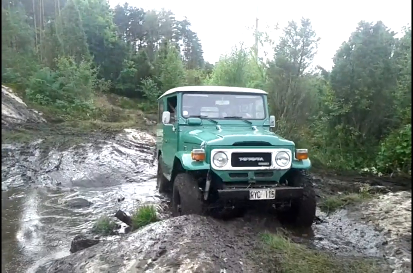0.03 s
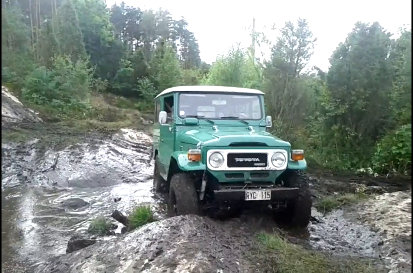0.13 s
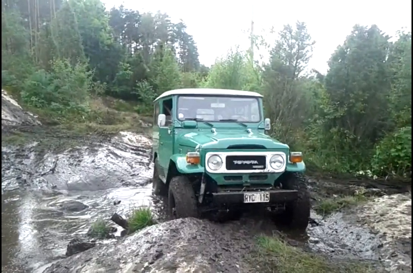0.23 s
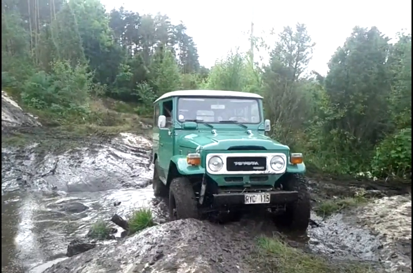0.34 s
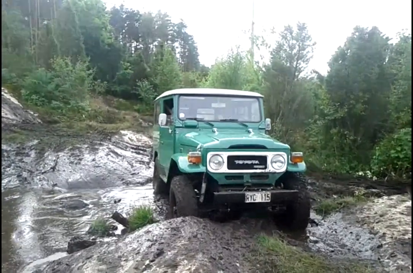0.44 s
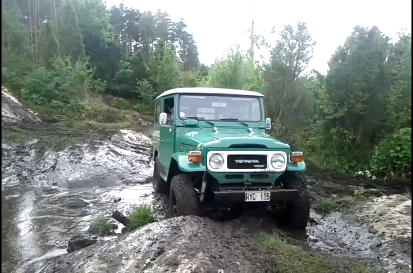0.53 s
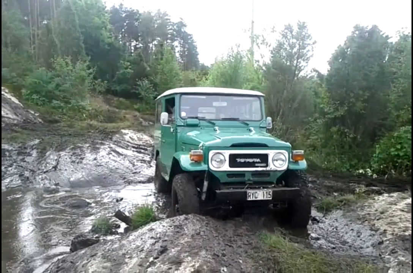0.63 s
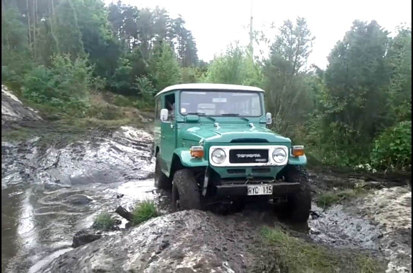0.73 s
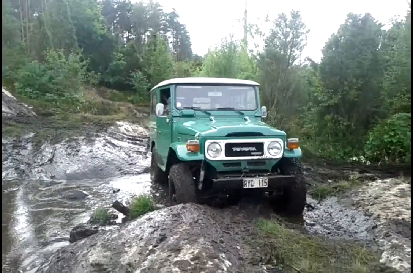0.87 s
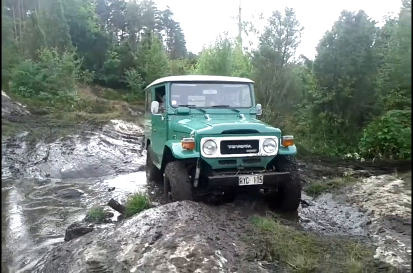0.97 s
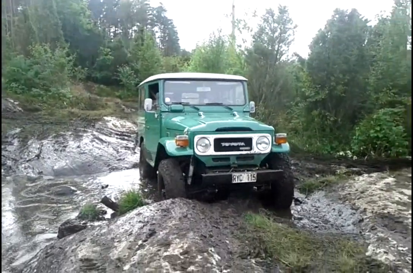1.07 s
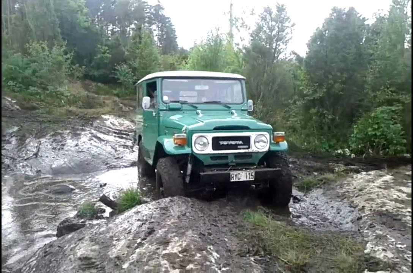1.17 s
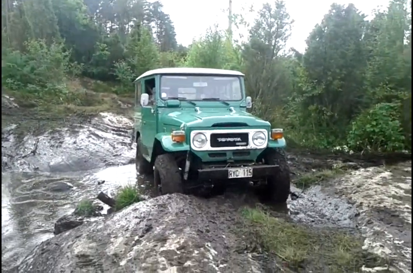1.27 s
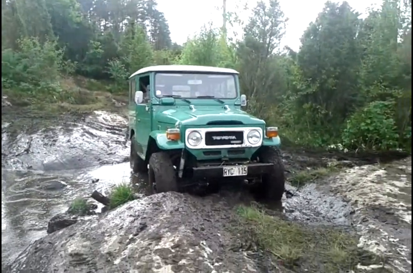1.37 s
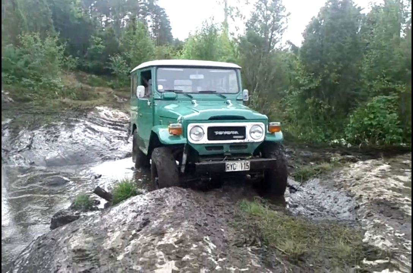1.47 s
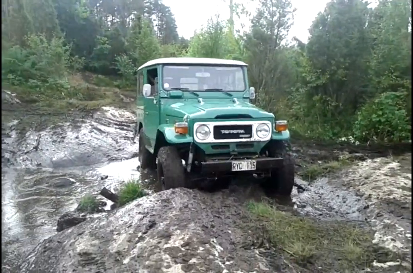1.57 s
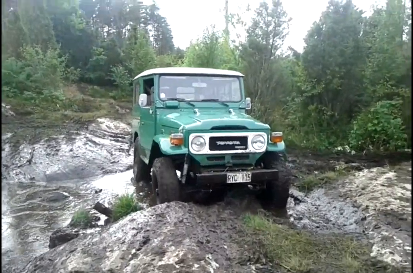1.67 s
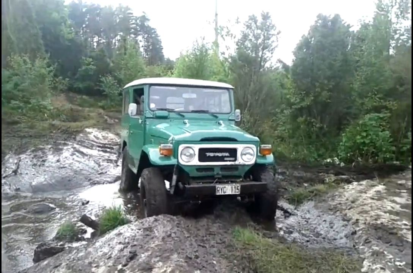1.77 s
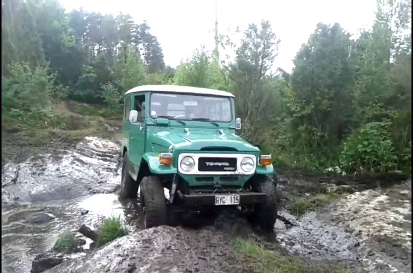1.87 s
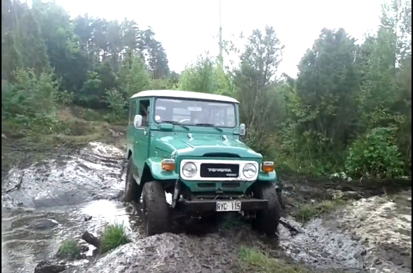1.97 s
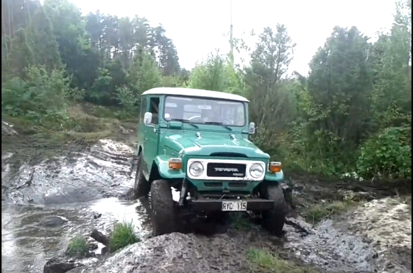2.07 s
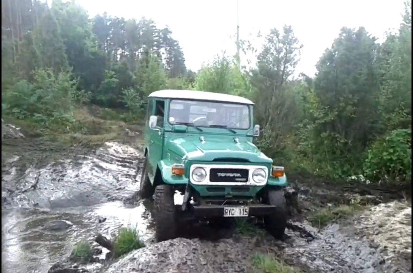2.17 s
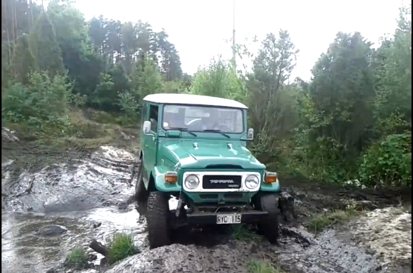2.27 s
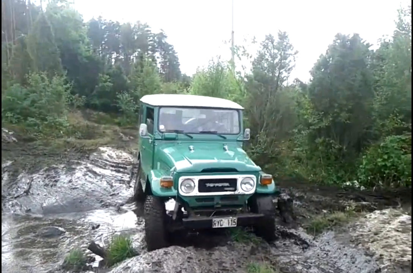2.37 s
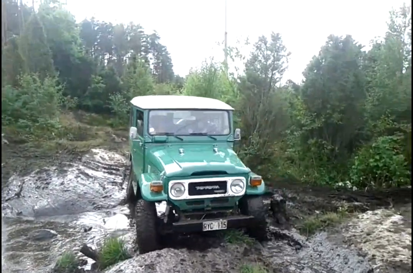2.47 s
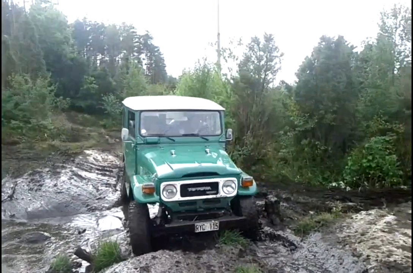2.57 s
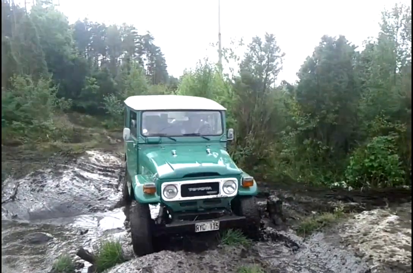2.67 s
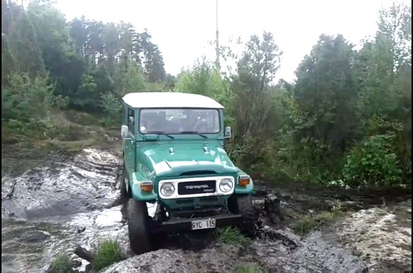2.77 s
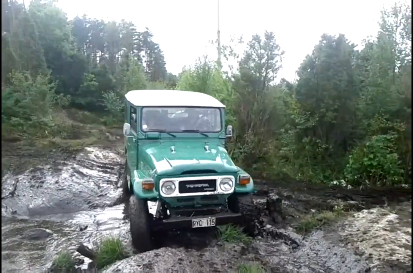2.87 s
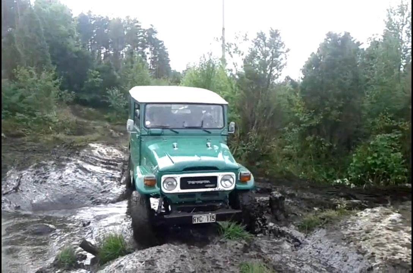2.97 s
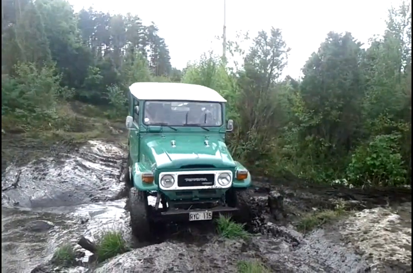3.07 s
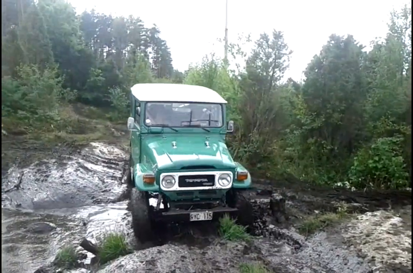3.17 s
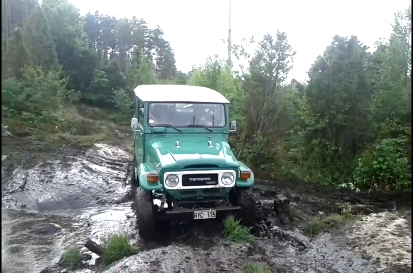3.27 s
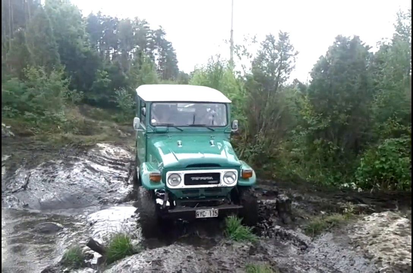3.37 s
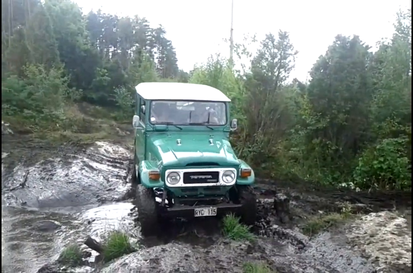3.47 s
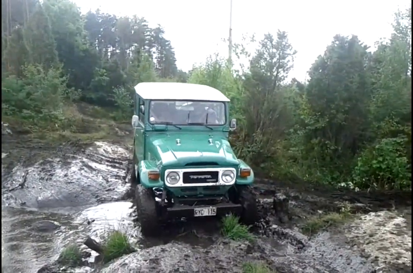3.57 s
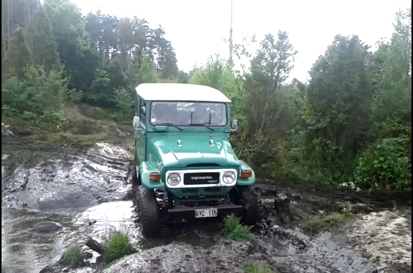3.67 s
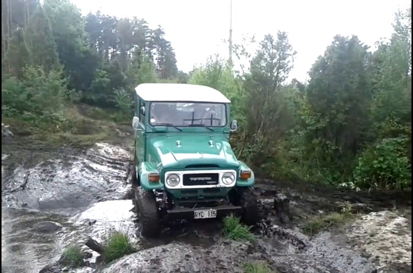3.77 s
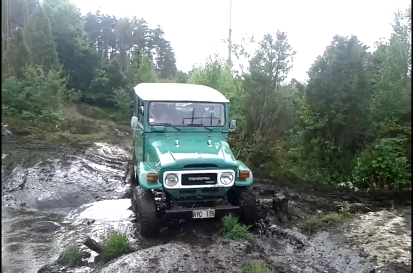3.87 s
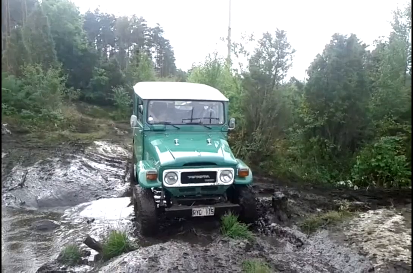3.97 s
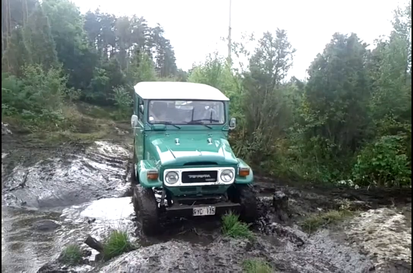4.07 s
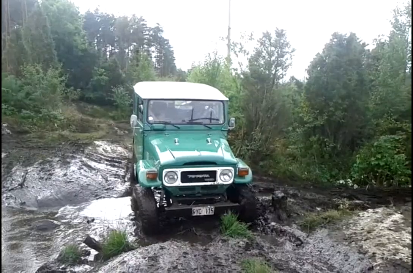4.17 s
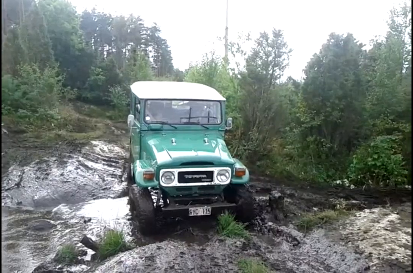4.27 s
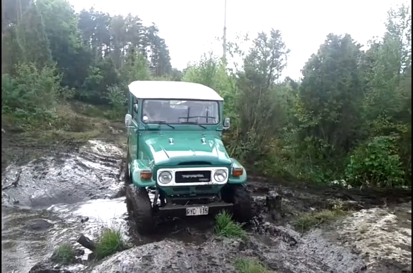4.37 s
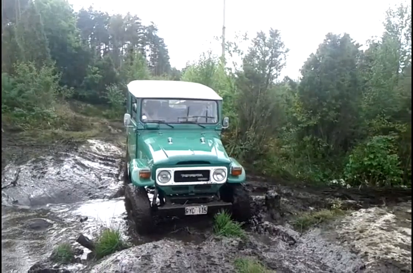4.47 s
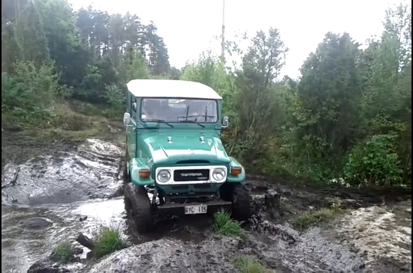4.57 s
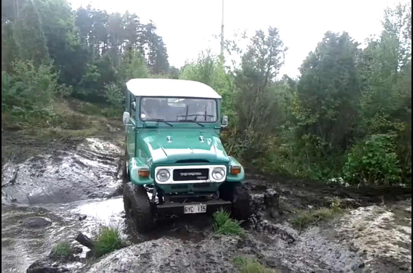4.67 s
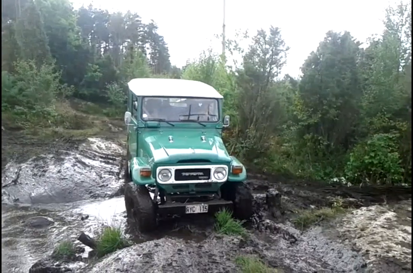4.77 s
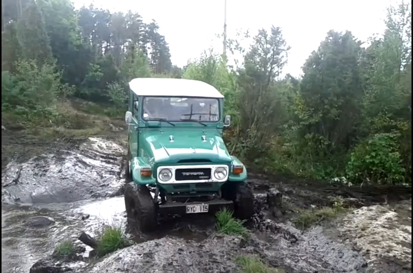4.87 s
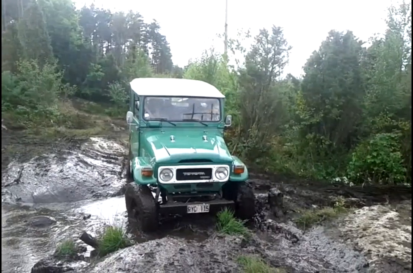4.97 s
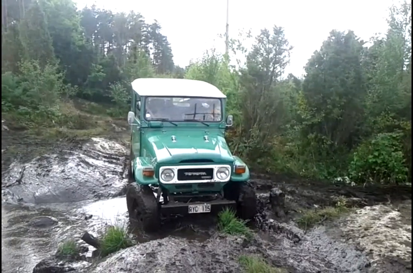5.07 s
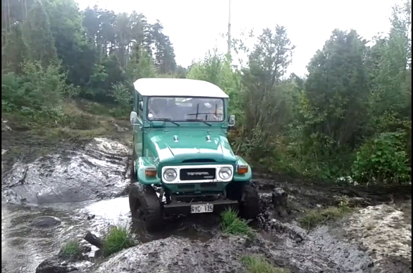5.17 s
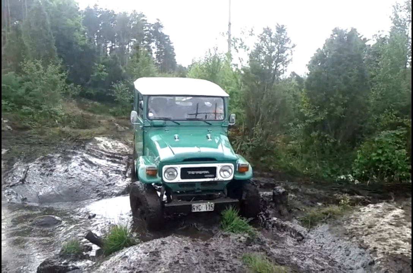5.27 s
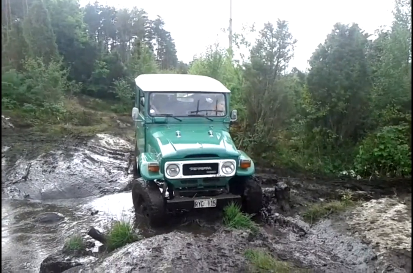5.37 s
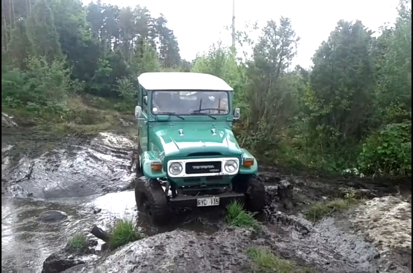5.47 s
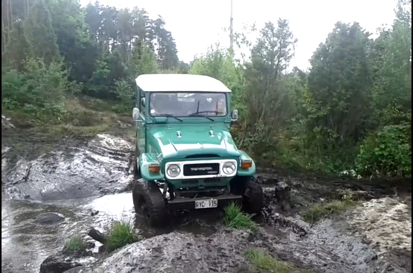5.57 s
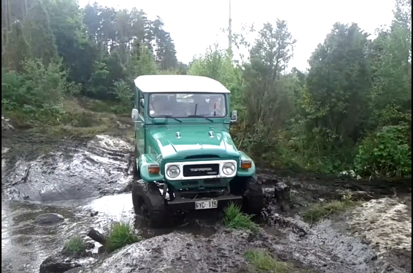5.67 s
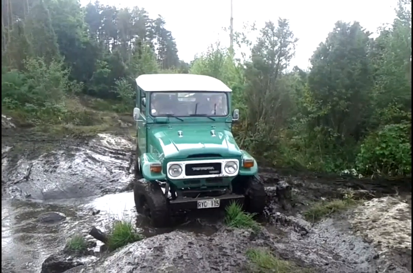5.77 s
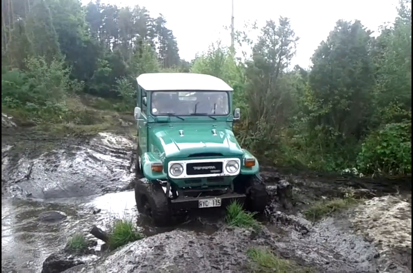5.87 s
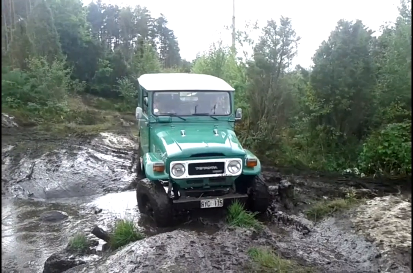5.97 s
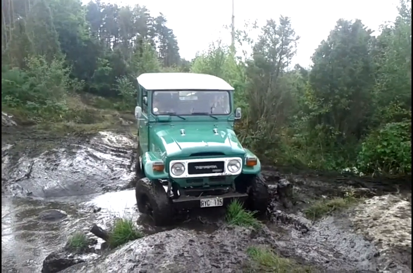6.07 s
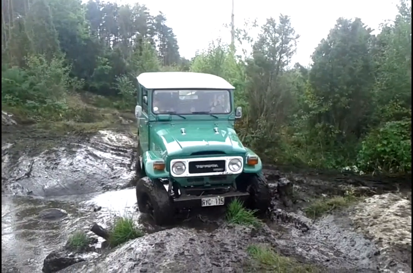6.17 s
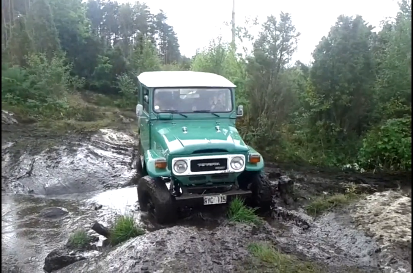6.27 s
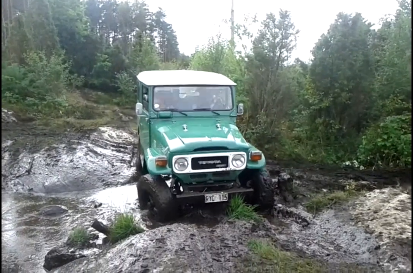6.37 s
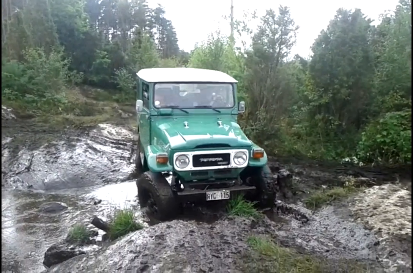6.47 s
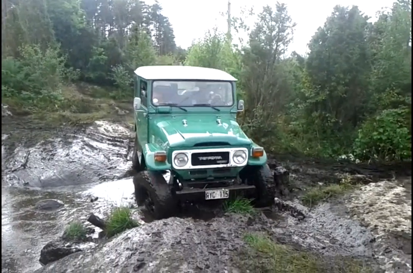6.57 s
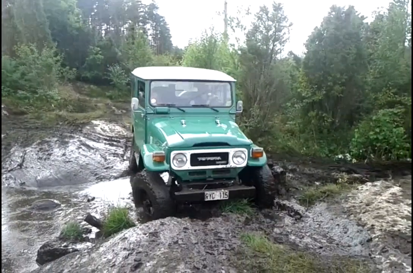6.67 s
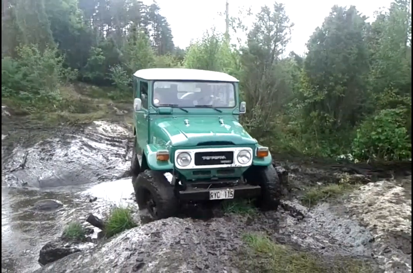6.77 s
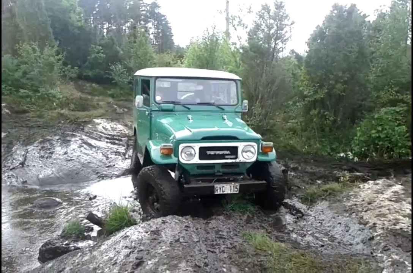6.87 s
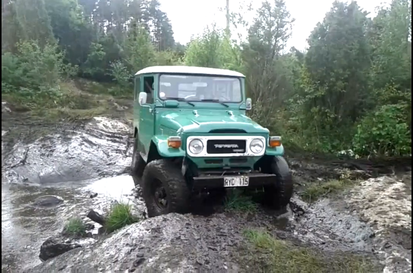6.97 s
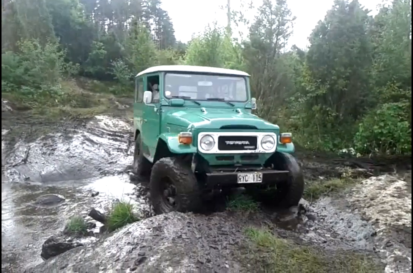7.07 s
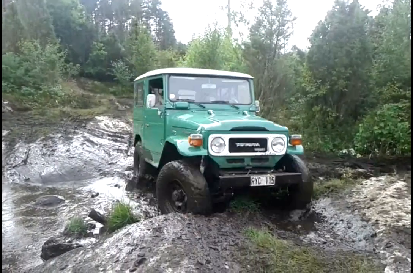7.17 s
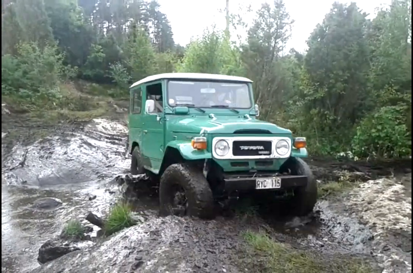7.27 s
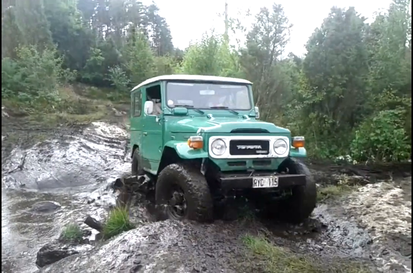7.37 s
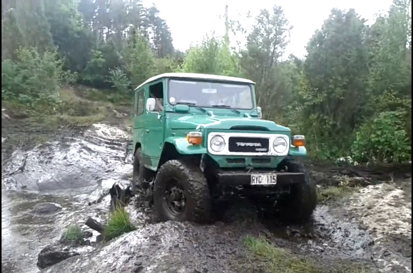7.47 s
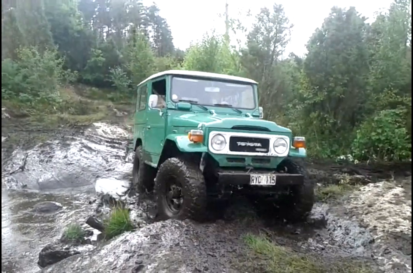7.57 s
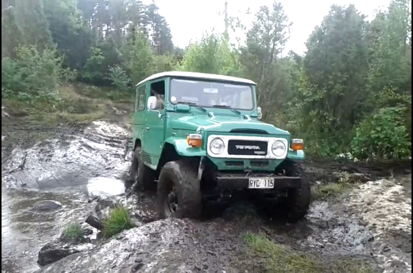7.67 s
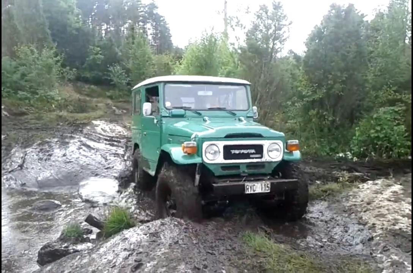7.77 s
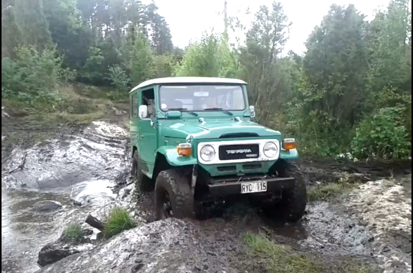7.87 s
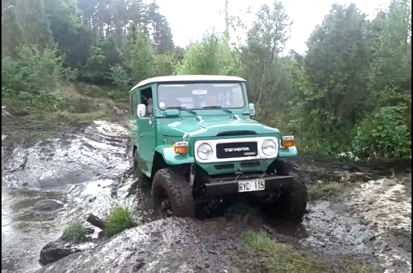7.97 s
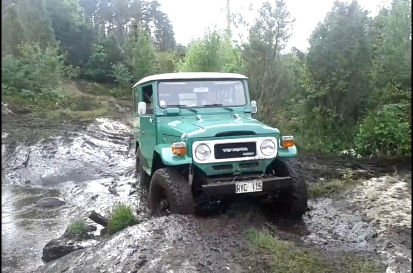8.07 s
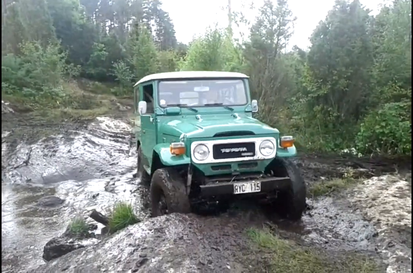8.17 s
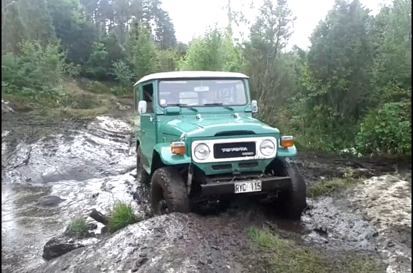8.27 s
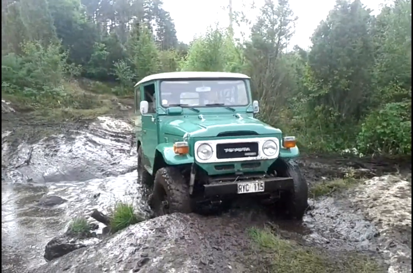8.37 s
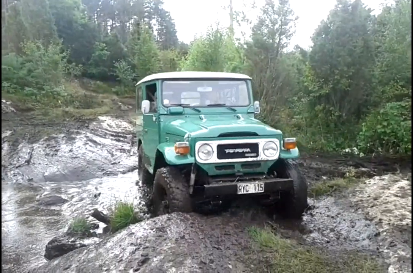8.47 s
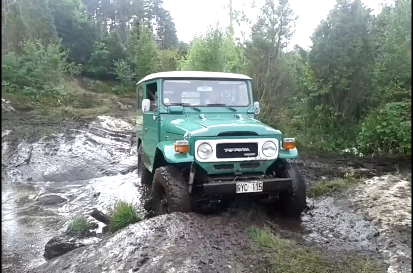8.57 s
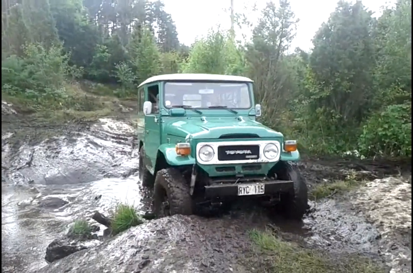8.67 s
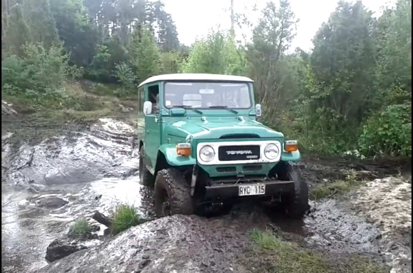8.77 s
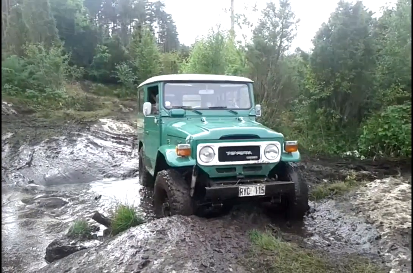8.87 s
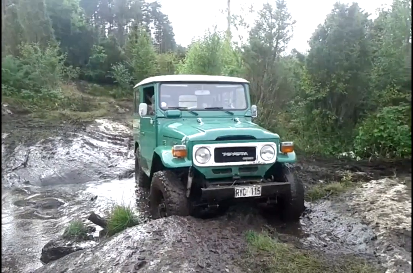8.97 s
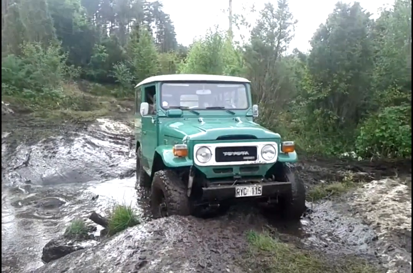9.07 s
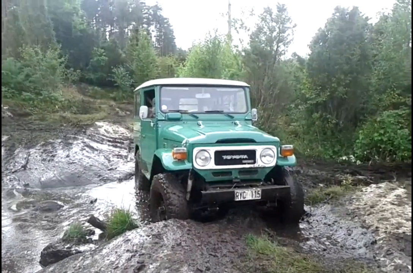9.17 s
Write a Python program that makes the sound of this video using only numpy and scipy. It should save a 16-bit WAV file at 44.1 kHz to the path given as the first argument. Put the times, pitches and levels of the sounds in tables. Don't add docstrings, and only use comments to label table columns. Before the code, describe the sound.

Close rattling diesel engine labours in mud, surging and dropping to idle before one hard growling rev, with spring squeaks, thuds and wet hiss.

```python
import sys
import numpy as np
from scipy import signal
from scipy.fft import rfft, irfft, next_fast_len
from scipy.io import wavfile
from scipy.ndimage import uniform_filter1d

SR = 44100
rng = np.random.default_rng(int(sys.argv[2]) if len(sys.argv) > 2 else 0)


def nominal_scale(level):
    x = np.asarray(level, float) / 20
    return 10 ** x


def generate_wav(sig):
    pcm = np.round(np.clip(np.atleast_2d(sig).T, -1, 1) * 32767).astype(np.int16)
    wavfile.write(sys.argv[1], SR, pcm)


N = 406602

# (time [s], fuelling as knock level [dB], driveline strain [dB])
LOAD = [(0, -18.5, -6), (.45, -23.5, -6), (.85, -25, -8.5), (1.5, -20.5, -6), (1.87, -21.5, -4),
        (2.2, -25, -6), (2.5, -23, -5.5), (2.87, -23.5, -3.5), (3.08, -26, -7.5), (5.2, -27, -8.5),
        (6.5, -25, -6), (7.28, -17, -5.5), (7.5, -14.5, -0.5), (7.68, -12, -4.5), (7.85, -16, -6),
        (8.2, -15.5, -6), (8.45, -20, -5), (9.22, -25, -6.5)]
IDLER_HZ = 23.2


def evened(x):
    return x / np.sqrt(np.mean(x ** 2) + 1e-20)


def curves(rows):
    s, *columns = np.transpose(rows)
    return [np.interp(np.arange(N) / SR, s, c) for c in columns]


def swells(rows):
    t = np.arange(N) / SR
    return sum(
        height * np.cos(np.pi / 2 * np.clip((t - s) / half, -1, 1)) ** 2
        for s, half, height in rows)


def load_db(offset_db, db_per_strain_db):
    fuel_db, strain_db = curves(LOAD)
    return fuel_db + offset_db + db_per_strain_db * strain_db


def wander(hz):
    step_rate_hz = 400
    steps = rng.standard_normal(4096)
    slow = irfft(rfft(steps) / (1 + (np.fft.rfftfreq(4096, 1 / step_rate_hz) / hz) ** 4))
    return np.interp(np.arange(N) * step_rate_hz / SR, np.arange(4096), evened(slow))


def shape(x, gain):
    size = next_fast_len(N)
    return irfft(rfft(x, size) * gain(np.fft.rfftfreq(size, 1 / SR)), size)[..., :N]


def colour(x, points):
    f, db = np.transpose(points)
    log_f = np.log(f + 1)
    return evened(shape(x, lambda hz: nominal_scale(np.interp(np.log(hz + 1), log_f, db, -120, -120))))


def ring(x, modes):
    def gain(hz):
        return sum(nominal_scale(db) / (1 + 2j * (hz - f) / width) for f, width, db in modes)
    return evened(shape(x, gain))


def patchy(x, patchy_db, bins, frames):
    z = signal.stft(x, nperseg=512, noverlap=384)[2]
    field = uniform_filter1d(rng.standard_normal(z.shape), bins, 0)
    field = evened(uniform_filter1d(field, frames, 1))
    return evened(signal.istft(z * nominal_scale(patchy_db * field), nperseg=512, noverlap=384)[1][:N])


def add(mix, s, sound):
    part = mix[round(s * SR):][:len(sound)]
    part += sound[:len(part)]


def blows(turns, late, spread_db, decay_s):
    draw = rng.standard_normal((500, 2))
    firing = np.arange(500) + late + .025 * draw[:, 0]
    at = np.interp(firing, turns, np.arange(N)).astype(int)
    train = np.bincount(at, nominal_scale(spread_db * draw[:, 1]), N)
    train[-1] = 0
    t = np.arange(SR // 10) / SR
    return signal.oaconvolve(train, (1 - np.exp(-t / .002)) * np.exp(-t / decay_s))[:N]


def exhaust_drone_db():
    # (time [s], rise [s], fade [s], rms level [dB])
    pedal_lifts = [
        (.1, .3, .4, -29),
        (7.6, .2, .4, -28),
        (8.17, .38, 1.15, -29.5),
    ]
    t = np.arange(N) / SR
    each_db = [
        db - 30 * ((t - s) / np.where(t < s, rise, fade)) ** 2
        for s, rise, fade, db in pedal_lifts]
    return np.max(each_db, axis=0).clip(-58)


def diesel():
    # (time [s], firing rate [1/s])
    speed = [(0, 52.5), (.3, 45.8), (.85, 25), (1.3, 35.5), (1.92, 40.3), (2.3, 25), (2.8, 36.5),
             (3.0, 23.3), (6.46, 22.8), (6.8, 40), (7.3, 54), (7.46, 74), (7.65, 70.3), (7.8, 51.5),
             (7.9, 51.5), (8.17, 59.3), (8.7, 43.8), (9.22, 36)]
    # (middle [s], half length [s], firing rate rise [1/s])
    blips = [
        (5.95, .27, 10.5),
    ]
    # (frequency [Hz], density [dB per Hz])
    knock_spectrum = [(470, -30), (800, -12), (973, -12.5), (1180, -4.5), (1360, -4.5), (1470, -4.5),
                      (1990, -2.5), (2300, -2.5), (2420, -2), (2590, -1.5), (2830, -3.5), (2990, -2.5),
                      (3230, -7), (3800, -13.5), (4940, -28), (8360, -120)]
    hiss_spectrum = [(2000, -26), (3400, -1.5), (4070, -4.5), (5020, -0.5), (6610, -5), (6950, -14),
                     (9040, -42), (15300, -120)]
    boom_spectrum = [(220, -33), (380, -27.5), (486, -1.5), (532, -2), (560, 0), (652, -1.5), (913, -5.5),
                     (1050, -3), (1360, -28), (2310, -120)]
    rumble_spectrum = [(59, -20), (100, -12), (140, -2.5), (198, -0.5), (415, -9), (460, -6), (600, -33),
                       (1010, -120)]
    # (frequency [Hz], width [Hz], level [dB])
    cover_modes = [(2275, 80, -1), (2345, 60, 1), (2420, 80, -2), (2700, 300, -9), (3050, 300, -11)]
    panel_modes = [(619, 30, -2), (673, 6.9, -1.5), (745, 88, -6), (1195, 110, -5.5)]
    # (multiple of firing rate [1], level [dB])
    hum_orders = [(1, -3), (2, -10), (3, -5), (6, -5.5), (8, -3), (12, -5.5)]
    # (middle [s], half length [s], level [dB])
    rattles = [
        (.15, .3, 2.5),
        (.6, 0.83, 5.5),
        (1.17, 0.25, 8),
        (5.85, 0.83, 5.5),
        (6.55, 0.34, 1.5),
    ]
    whines = [
        (1.85, .25, 25.5),
    ]
    splashes = [
        (1.1, .25, 1.6),
        (6.82, .1, 3),
        (7.62, 0.077, 2.4),
        (8.15, .1, 1),
    ]
    scrapes = [
        (8.1, 0.24, 5),
        (2.74, 0.15, 2.5),
        (6.8, 0.11, -4),
    ]

    rate, knock_db = curves(speed)[0], curves(LOAD)[0]
    rate = rate * (1 + .035 * wander(2.56) * (IDLER_HZ / rate) ** 2) + swells(blips)
    pull = np.tanh(np.gradient(uniform_filter1d(rate, SR // 4)) * SR / 9.2)
    sharp = 0.23 + (0.69 - 0.23) / (1 + (rate / 46.5) ** 8)
    sharp *= 1 + .4 * pull.clip(-1, 0)
    turns = np.cumsum(rate * (1 + .012 * wander(9))) / SR
    burn = blows(turns, 0, 1.7, .008)
    tappets = .5 * blows(turns, .3, 3, .005) + .5 * blows(turns, .75, 2.5, .0014)
    shake = nominal_scale(0.25 * wander(6.0))

    def drive(steady, burst, tick, grit=170):
        gate = steady + sharp * (burst * burn + tick * tappets)
        gate /= np.sqrt(uniform_filter1d(gate ** 2, SR // 8))
        loose = rng.random(N) < grit * gate ** 2 / SR
        return gate * shake * rng.standard_normal(N) * (1 + 4 * loose)

    def order(k, db):
        return nominal_scale(db + 2.6 + 2.2 * wander(18)) * np.sin(2 * np.pi * (k * turns + rng.random()))

    knock = patchy(colour(drive(0.67, 0.65, 0.77), knock_spectrum), 0.46, bins=4, frames=8)
    sump = shape(knock, lambda hz: 1 / (1 + (hz / 1500) ** 8))
    shift_db = 0.73
    sump_db = -5.5 + shift_db * wander(6) + swells(scrapes)
    knock = evened(knock - sump) + nominal_scale(sump_db) * evened(sump)

    cover = ring(drive(.22, 1.5, .6, grit=500), cover_modes)
    cover_db = -7.5 + shift_db * wander(6) + swells(rattles)
    block = nominal_scale(knock_db) * (nominal_scale(-2.02) * knock + nominal_scale(cover_db) * cover)

    hiss = patchy(colour(drive(0.73, 0.92, 0.46), hiss_spectrum), 1.0, bins=5, frames=8)
    pull_db = 0.4 * 2 * pull * (1 - IDLER_HZ / rate)
    hiss_db = load_db(-0.65, 0.47) + pull_db + swells(splashes)

    shell = drive(0.98, 0.38, 0.071)
    boom = nominal_scale(-4.5) * patchy(colour(shell, boom_spectrum), 2.2, bins=1, frames=30)
    boom += nominal_scale(-8) * ring(shell, panel_modes)
    rumble = colour(drive(.9, .3, 0.092), rumble_spectrum)

    drone_db = exhaust_drone_db()
    tones = order(4, drone_db) + order(8, drone_db - 11)
    tones += order(12.5, -62 + swells(whines))
    hum_db = load_db(-18.5, 0.93)
    tones += sum(order(k, hum_db + db) for k, db in hum_orders)

    body = nominal_scale(load_db(.1, 1.05)) * boom + nominal_scale(load_db(-12, 0.13)) * rumble
    return block + nominal_scale(hiss_db) * hiss + body + tones


def gears():
    # (time [s], length [s], from [Hz], to
    # [Hz], level [dB])
    glides = [
        (7.49, .24, 570, 750, -19),
        (8.04, .17, 660, 790, -27),
        (2.63, .25, 585, 620, -31),
        (7.47, .16, 520, 470, -23),
        (1.47, .3, 450, 500, -32),
        (1.58, .44, 672, 645, -30),
        (8.1, .25, 500, 425, -30),
    ]
    mesh_hz = 663 * (1 + .015 * wander(1.5))
    mesh_db = load_db(-5.5, 1.8)
    spin = 2 * np.pi * np.cumsum(mesh_hz * (1 + .006 * wander(25))) / SR
    out = nominal_scale(mesh_db + .5 + 3 * wander(20)) * np.sin(spin)
    rough = nominal_scale(3 * wander(25))
    for s, length_s, from_hz, to_hz, db in glides:
        u = np.linspace(0, 1, round(length_s * SR))
        turns = np.cumsum(from_hz + (to_hz - from_hz) * u) / SR
        swell = rough[round(s * SR):][:len(u)] * np.sqrt(np.sin(np.pi * u).clip(0))
        add(out, s, nominal_scale(db) * swell * np.sin(2 * np.pi * turns))
    return out


def idler():
    # (multiple of firing rate [1], level [dB])
    firing_lines = [(2, -53), (3, -53), (4, -43.5), (5, -58), (6, -59), (7, -59)]
    # (middle [s], half length [s], level [dB])
    blower_swells = [(.4, 0.28, 7.6), (2.15, 0.74, 10.4), (3.2, .3, 8), (3.85, 0.46, 8.2), (4.3, 0.18, 6.8),
                     (4.92, .13, 10), (5.2, .13, 7.8), (5.65, 0.37, 7.5), (6.3, 0.43, 12), (7.4, .3, 11),
                     (8.05, 0.34, 8.5)]
    # (middle [s], half length [s], level [dB])
    can_swells = [
        (1.5, .5, 12),
        (2.7, .8, 11),
        (6.75, 0.31, 12),
        (8.4, 1.3, 7.3),
    ]
    # (frequency [Hz], width [Hz], level [dB])
    can_modes = [(297, 9, -1), (305.7, 3.9, -7)]
    # (frequency [Hz], density [dB per Hz])
    ground_spectrum = [(12, -44.5), (20, -34), (75, 2.5), (101, -7.5), (125, 4), (160, -29), (280, -120)]

    turns = np.cumsum(IDLER_HZ * (1 + 0.0018 * wander(0.52))) / SR
    lines = sum(
        nominal_scale(db + 3 * wander(3)) * np.sin(2 * np.pi * (k * turns + rng.random()))
        for k, db in firing_lines)
    blower_hz = 185 * (1 + 0.0352 * wander(1.26))
    blower_db = -52.5 + swells(blower_swells)
    spin = 2 * np.pi * np.cumsum(blower_hz * (1 + 0.0051 * wander(4.9))) / SR
    blower = nominal_scale(blower_db + 1.3 * wander(3.4)) * (np.sin(spin) + nominal_scale(6.5) * np.sin(spin / 2))
    noise = rng.standard_normal(N)
    can = nominal_scale(-49 + swells(can_swells)) * ring(noise, can_modes)
    ground = nominal_scale(-42) * colour(noise, ground_spectrum)
    return np.sqrt(2) * (lines + blower) + can + ground


def chassis():
    # (time [s], level [dB], frequency [Hz], length [s])
    squeaks = [
        (1.592, -15, 5400, .024),
        (1.822, -12, 4800, .02),
        (1.838, -17, 5700, .02),
        (1.852, -20, 4950, .02),
        (7.152, -19, 5900, .035),
        (7.16, -20, 6150, .03),
        (2.94, -24, 5300, .02),
        (5.75, -31, 6500, .06),
    ]
    # (time [s], level [dB], frequency [Hz], t60 [s])
    thuds = [(7.366, -6, 210, .16), (7.34, -14, 290, .12), (7.392, -6, 265, .07), (7.393, -13, 680, .04),
             (2.425, -19, 730, .1), (2.445, -18, 700, .1), (1.235, -26, 210, .15), (1.768, -21, 1150, .06),
             (5.706, -6, 2450, .035), (7.505, -14, 575, .15), (7.49, -17, 490, .15), (7.575, -14, 670, .15),
             (7.42, -15, 230, .15), (8.06, -22, 75, .3), (7.325, -17, 640, .12)]
    out = np.zeros(N)
    for s, db, hz, length_s in squeaks:
        t = np.arange(round(length_s * SR)) / SR
        grip = evened(uniform_filter1d(rng.standard_normal(SR // 10), 45))[:len(t)]
        swell = (.85 + .55 * grip) * np.sin(np.pi * t / length_s)
        add(out, s, nominal_scale(db) * swell * np.sin(2 * np.pi * hz * t))
    t = np.arange(SR // 4) / SR
    for s, db, hz, t60_s in thuds:
        envelope = nominal_scale(db - 60 * t / t60_s) * (1 - np.exp(-t / .002))
        add(out, s, envelope * np.sin(2 * np.pi * hz * t))
    return out


def scene():
    return np.tile(diesel() + gears() + idler() + chassis(), (2, 1))


def stored(x):
    # (frequency [Hz], drop threshold re local level [dB], favour for strong parts [1],
    # left-right difference [dB])
    thrift = [(100, -20, 0, -27), (1000, -8, .2, -27), (3000, -6, .25, -36), (6900, -6, .4, -30),
              (9100, -5.5, .4, -13), (11000, -3.5, .5, -11), (11800, -1.8, .6, -9), (14000, -2.5, .6, -9)]
    f, drop_db, favour, apart_db = np.transpose(thrift)
    hz, t, z = signal.stft(x, SR, "cosine", nperseg=2048, noverlap=1024)
    blocks = rng.standard_normal((3, 33, len(t) // 2 + 1))
    blocks = blocks.repeat(32, 1).repeat(2, 2)[:, :len(hz), :len(t)]
    near = uniform_filter1d(uniform_filter1d(abs(z), 4, 0), 3, 1)
    local = uniform_filter1d(near, 40, 0)
    z = z * (near > local * nominal_scale(np.interp(hz, f, drop_db)[:, None] + 1.3 * blocks[0]))
    z = z * (near / (local + 1e-12)) ** np.interp(hz, f, favour)[:, None]
    top_hz = 13850 + 90 * blocks[2, 0] + 450 * (blocks[2, 40] > 1.3)
    z = z * (hz[:, None] < top_hz)
    blur = (hz[:, None] > 10900) * (blocks[2] > -.3)
    z = np.where(blur, z * np.exp(2j * np.pi * rng.random(z.shape)), z)
    sign = rng.choice([-1, 1], z.shape)
    apart = z * nominal_scale(np.interp(hz, f, apart_db))[:, None] * (blocks[1] > .4) * sign
    tracks = np.array([z + apart, z - apart])
    return signal.istft(tracks, SR, "cosine", nperseg=2048, noverlap=1024)[1][:, :N]


def low_pass(x):
    return signal.sosfilt(signal.butter(12, 14810, fs=SR, output="sos"), x)


def record(dry):
    mirror_hz, edge_hz = 16000, 6950
    limited = dry[0] / (1 + (abs(dry[0]) / .84) ** 6) ** (1 / 6)
    mono = shape(limited, lambda hz: (hz < edge_hz) / (1 + (34 / (hz + 1)) ** 3))
    flipped = 2 * mono * np.cos(2 * np.pi * mirror_hz * np.arange(N) / SR + 2)

    def image_gain(hz):
        band = (hz > 9050) * (hz < 14450)
        return band * (abs(mirror_hz - hz) / (hz + 1)) ** 1.29 * nominal_scale(-1.0)

    mix = np.clip(stored(mono + shape(flipped, image_gain)), -1, 1)
    return low_pass(mix)


dry = scene()
out = record(dry)
generate_wav(out)
```